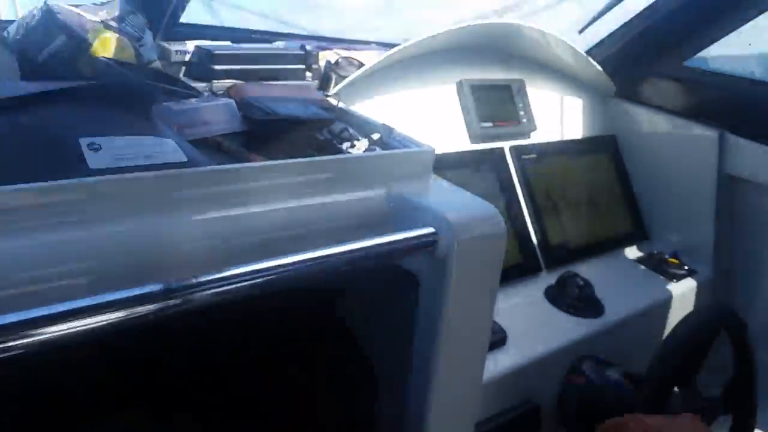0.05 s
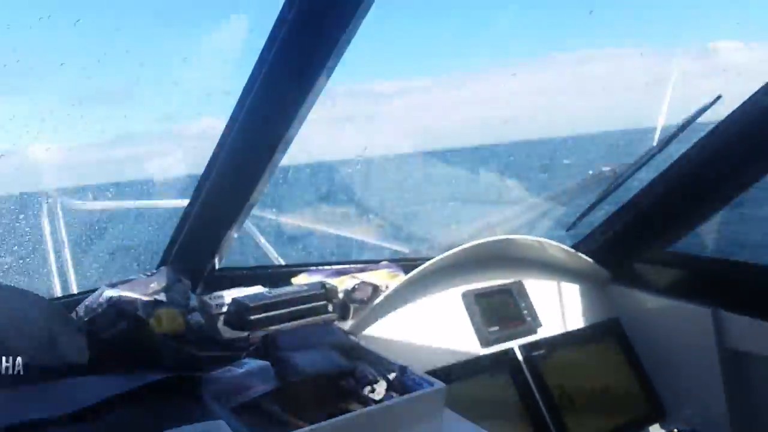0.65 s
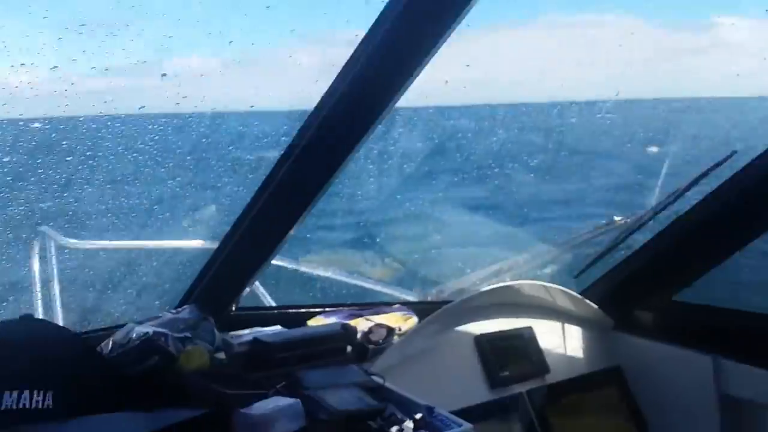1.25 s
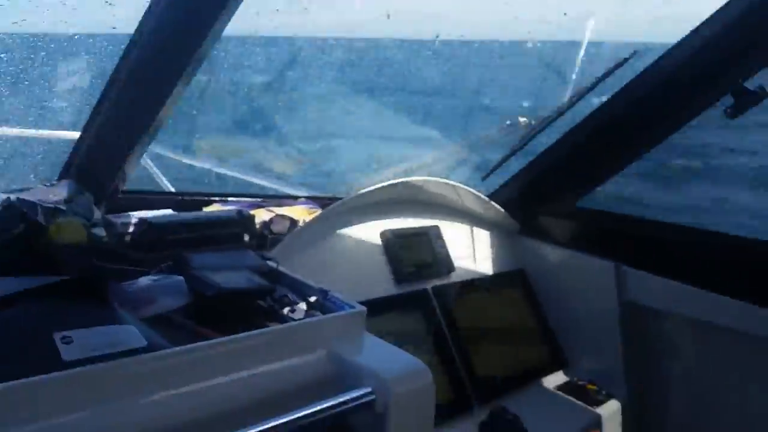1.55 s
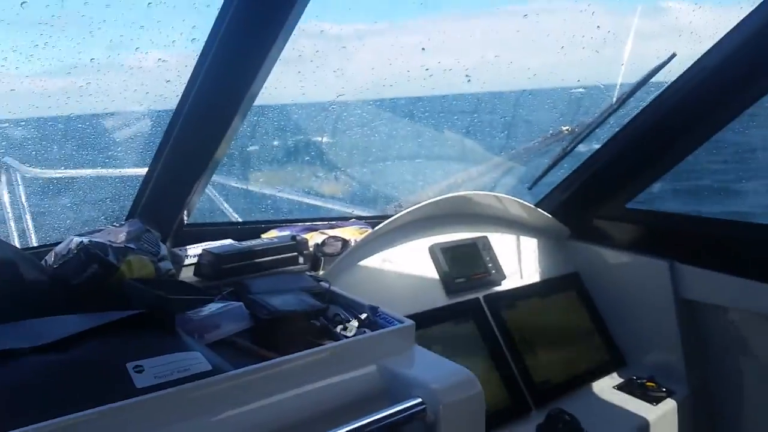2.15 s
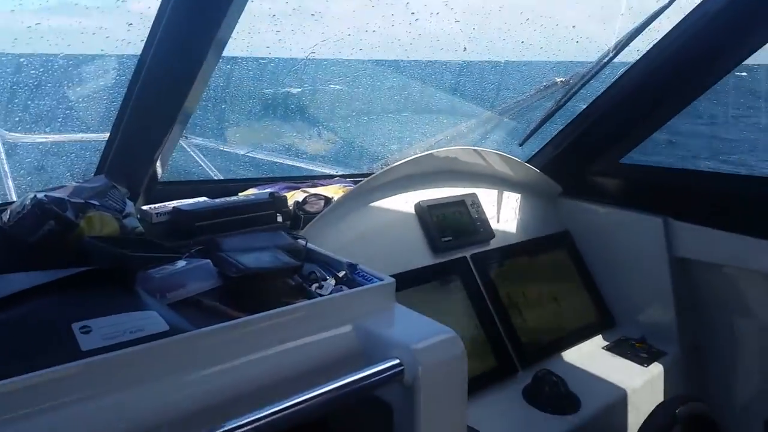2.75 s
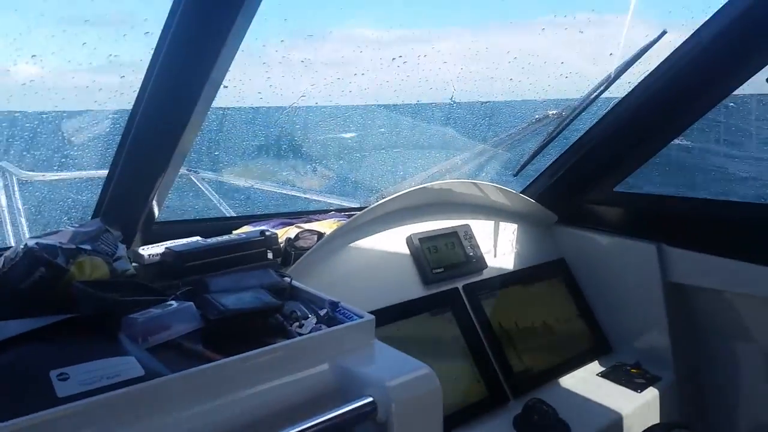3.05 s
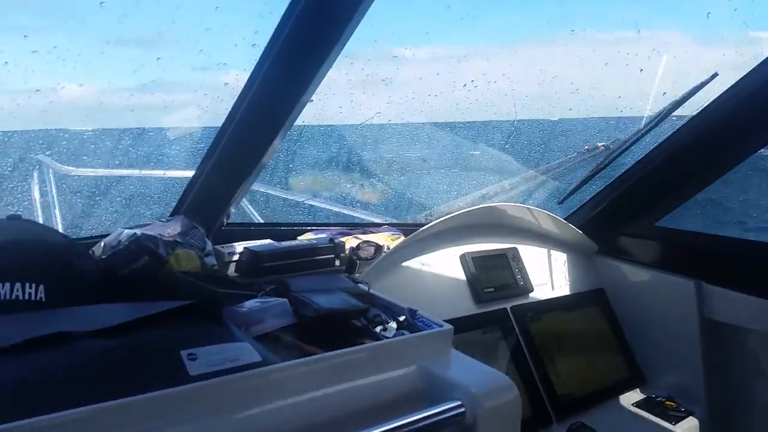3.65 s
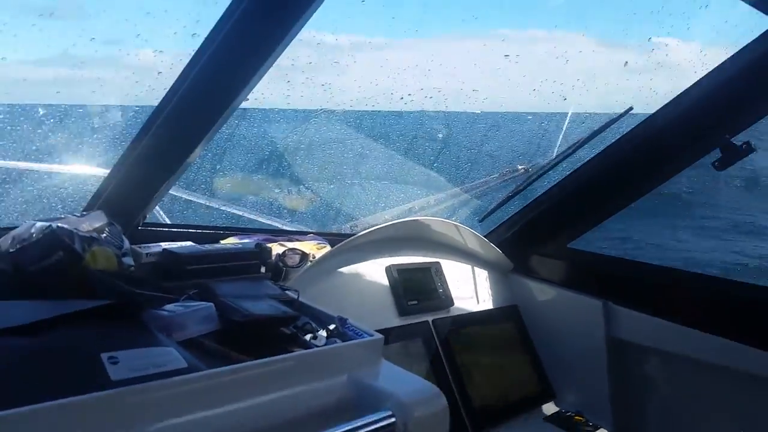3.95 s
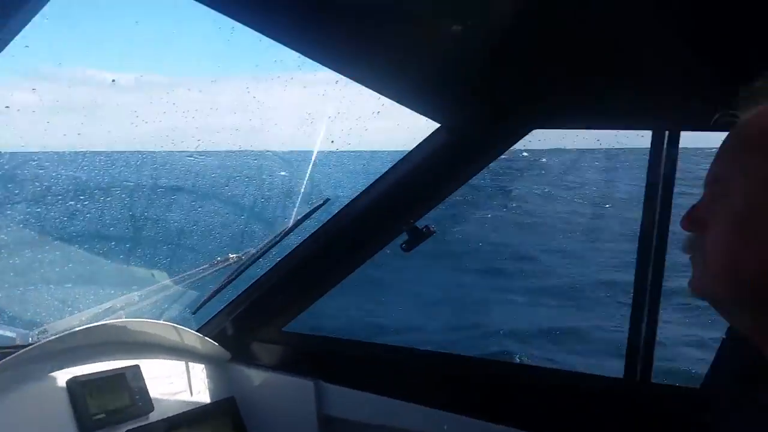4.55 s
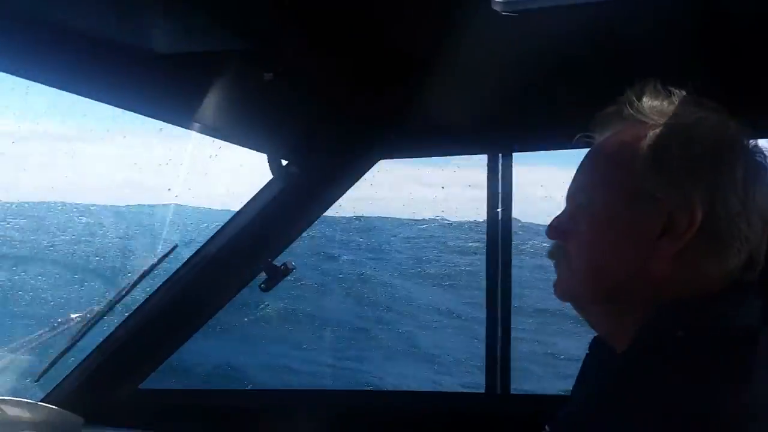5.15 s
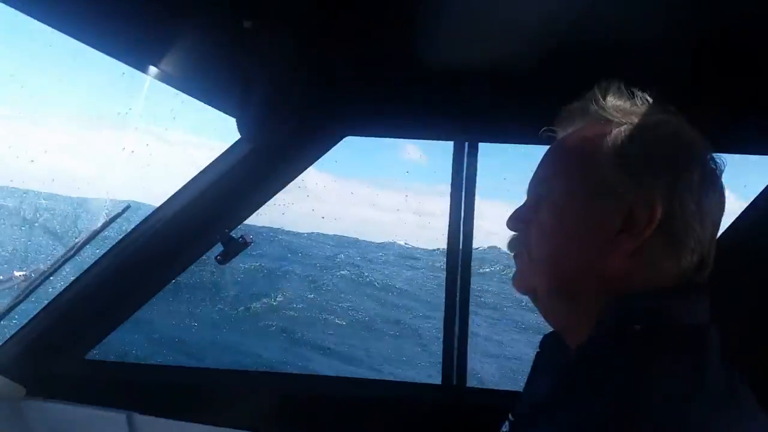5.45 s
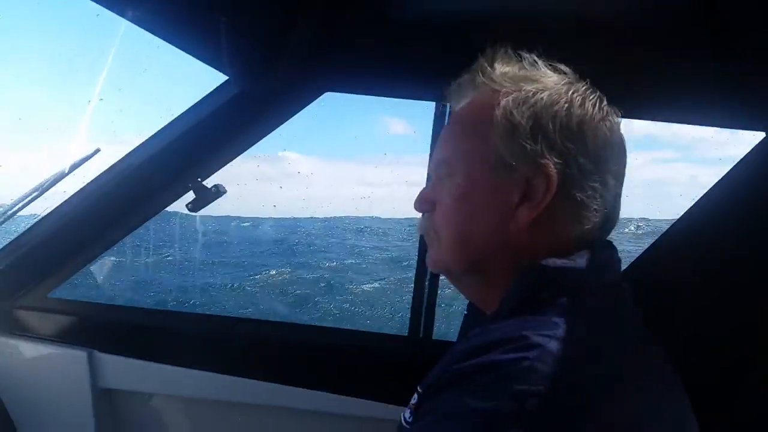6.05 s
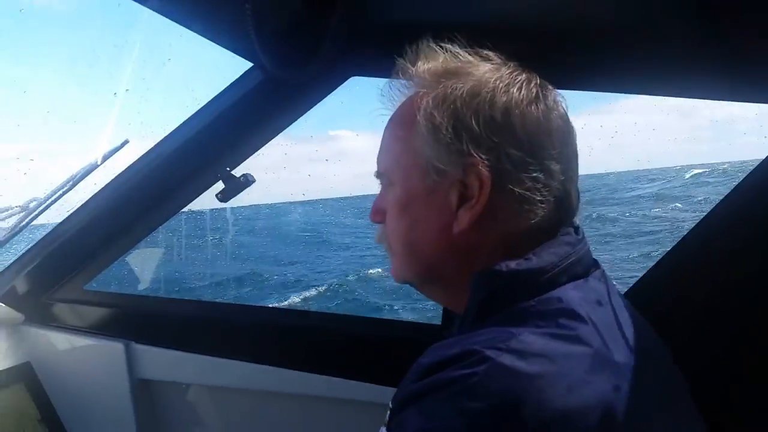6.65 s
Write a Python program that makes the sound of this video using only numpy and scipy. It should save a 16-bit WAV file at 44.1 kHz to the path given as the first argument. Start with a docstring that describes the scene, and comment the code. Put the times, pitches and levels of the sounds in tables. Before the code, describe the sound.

A motor boat in rough sea, heard from the cabin: engines drone, water rushes, waves thump the hull and spray hisses.

```python
"""A fast motor boat in a rough, windy sea, heard from inside the wheelhouse.
From the start, engines drone through the deck, water rushes along the sides and spray hisses overhead.
Around 1 s, waves thump the hull and the cabin panels knock. After a lull, the engines speed up and
the spray peaks near 2.2 s, and more thumps follow from 2.5 s. Lighter blows lead to another heavy run
at 5.2-5.6 s, and one last thump lands at 6.3 s while the engines drone on."""
import sys
import numpy as np
from scipy import signal
from scipy.fft import rfft, irfft, next_fast_len
from scipy.io import wavfile

SR = 44100
rng = np.random.default_rng(int(sys.argv[2]) if len(sys.argv) > 2 else 0)


def store_pcm(level_fs):
    """Save levels as 16-bit WAV."""
    pcm = np.round(np.clip(level_fs, -1, 1) * 32767).astype(np.int16)
    wavfile.write(sys.argv[1], SR, np.atleast_2d(pcm).T)


N = 304731
CUTOFF_HZ = 15900  # treble above this is cut
# cabin panels knocking as the hull bends: (time [s], relative peak [dB], pitch of the blow [Hz])
KNOCK_BLOWS = [(.898, -14, 546), (.91, -31, 556), (.925, -16, 537), (1.225, -17.5, 540), (2.64, -20, 464.5),
               (3.3, -26, 619.4), (4.028, -15, 560), (4.41, -21, 536), (4.52, -15, 442), (5.065, -23, 437),
               (5.44, -20, 407)]


def from_db(db):
    """Turn decibels into a number to multiply a sound by."""
    return 10 ** (np.asarray(db) / 20)


def rms_one(x):
    """Scale a sound so that its average power is 1."""
    return x / np.sqrt(np.mean(x ** 2) + 1e-20)


def in_time(rows):
    """Join the points of a time table with straight lines: one curve per value column."""
    times, *columns = np.transpose(rows)
    return [np.interp(np.arange(N) / SR, times, column) for column in columns]


def per_bin(rows, size):
    """Read a frequency table at every frequency (bin) of an FFT of this size."""
    hz, *columns = np.transpose(rows)
    bins = np.maximum(np.fft.rfftfreq(size, 1 / SR), 1)
    return [np.interp(np.log(bins), np.log(hz), column) for column in columns]


def drift(rate):
    """A smooth random wobble of typical size 1 that changes about `rate` times a second."""
    hz = np.fft.rfftfreq(8192, 1 / 1000)  # one point per millisecond
    slow = irfft(rfft(rng.standard_normal(8192)) / (1 + (hz / rate) ** 2))
    return np.interp(np.arange(N) / SR * 1000, np.arange(len(slow)), rms_one(slow))


def envelope(start_s, attack_s, hold_s, release_s):
    """A volume curve that rises, holds at 1 and dies away."""
    t = np.arange(N) / SR - start_s
    return np.clip(t / attack_s, 0, 1) * np.exp(-np.maximum(t - attack_s - hold_s, 0) / release_s)


def ring(force, hz, t60):
    """A mode, or natural tone: a push sets it ringing, and it fades by 60 dB in t60 seconds."""
    decay = from_db(-60 / (t60 * SR))
    step = 2 * np.pi * hz / SR
    return signal.lfilter([0, np.sin(step)], [1, -2 * decay * np.cos(step), decay * decay], force + 1e-18)


def strike(blows, modes, swings):
    """Each blow pushes and pulls for a few swings; a quicker blow wakes the higher tones."""
    t, out = np.arange(SR) / SR, np.zeros(N + SR)
    for start_s, peak_db, pitch_hz in blows:
        cycles = pitch_hz * t
        force = np.sin(2 * np.pi * cycles) * np.sin(np.pi * np.minimum(cycles / swings, 1)) ** 2
        ringing = sum(from_db(db) * ring(force, hz, t60) for hz, db, t60 in modes)
        at = int(start_s * SR)
        out[at:at + SR] += from_db(peak_db) * ringing / np.abs(ringing).max()
    return out[:N]


def turbulence():
    """Two unrelated streams of random pressure (white noise)."""
    return rng.standard_normal((2, N))


def drops(per_s, spread_db):
    """Two streams of clicks from landing drops: many small ones, a few large."""
    sizes = from_db(spread_db * np.minimum(rng.exponential(1, (2, N)), 5))
    signs = np.sign(turbulence())
    lands = rng.random((2, N)) < per_s / SR
    return rms_one(sizes * signs * lands)


def in_cabin(streams, spectrum):
    """Shape the tone of two streams and spread them around the cabin, most alike in the bass; power 1."""
    # how alike left and right are: (frequency [Hz], correlation [-1 to 1])
    likeness = [(50, 0.9), (130, 0.95), (270, 0.73), (400, 0.88), (560, 0.48), (800, .45), (1050, -0.12),
                (1450, -0.48), (2000, -0.16), (2600, 0.26), (3500, -0.11), (6000, -0.0032)]
    size = next_fast_len(N)
    level_db, = per_bin(spectrum, size)
    hz = np.fft.rfftfreq(size, 1 / SR)
    gain = from_db(level_db) * (hz > spectrum[0][0]) * (hz < spectrum[-1][0])
    alike = np.clip(per_bin(likeness, size)[0], -1, 1)
    mid, side = rfft(streams, size) * gain * np.sqrt([1 + alike, 1 - alike])
    return rms_one(irfft([mid + side, mid - side], size)[:, :N])


def spray(surge_db):
    """Splashes, spray and fine mist land on the glass and roof; splashes grow with flow and spray."""
    # water in the air: (time [s], relative spray level [dB], relative mist level [dB])
    airborne = [(0.0, -42.5, -46.5), (0.38, -41, -46.5), (0.8, -45, -50.5), (1.1, -47.5, -58.5),
                (1.57, -49.5, -55.0), (1.76, -40.5, -44.5), (1.98, -40.5, -44.5), (2.2, -36, -40),
                (2.36, -39.0, -39), (2.5, -46.5, -50.0), (3.05, -45.5, -51.0), (3.35, -43.5, -45.0),
                (3.62, -43.5, -47.0), (3.92, -40.5, -44.5), (4.22, -47.5, -49.5), (5.25, -44, -49.5),
                (5.48, -50, -56.5), (5.85, -47, -50.5), (6.55, -43.5, -49.5), (6.91, -45.0, -49.5)]
    # tone of heavy splashes, spray and mist, each: (frequency [Hz], relative level [dB])
    splash_tone = [(600, -1), (1200, 0), (1800, -4.5), (2400, -0.5), (3300, -4), (4800, -4.5),
                   (9000, -33.5)]
    hiss_tone = [(1800, -9), (3200, -5), (4500, -1), (7000, 1.5), (9000, -3), (14000, -22)]
    mist_tone = [(5000, -34), (7500, 0), (9500, 3.5), (12000, -1), (16000, -5.5)]
    hiss_db, mist_db = in_time(airborne)
    patter_db = 0.5 * drift(21)
    lumps_db = 1.3 * drift(5.6)
    splash_db = -40.5 + 0.45 * surge_db + 0.51 * (hiss_db - hiss_db.mean()) + lumps_db
    splash = from_db(splash_db) * in_cabin(turbulence() + 0.62 * drops(2500, 1.9), splash_tone)
    hiss = from_db(hiss_db + 1.5) * in_cabin(turbulence() + 0.5 * drops(4000, 3.5), hiss_tone)
    mist = from_db(mist_db + 6.0) * in_cabin(turbulence() + 0.77 * drops(5000, 2.9), mist_tone)
    return from_db(patter_db) * (splash + hiss + mist)


def spray_slaps(band_ratio=1.94):
    """A sheet of spray lands on the glass, swells for a moment and runs off."""
    # single sheets of spray: (time [s], level [dB], centre frequency [Hz], swell time [s])
    sheets = [(.292, -37, 7000, .008), (.89, -36.5, 2210, 0.026), (1.03, -38.5, 4000, 0.01),
              (1.205, -34, 2790, 0.011), (2.555, -41, 2200, 0.025), (2.655, -35.5, 3500, 0.014),
              (2.765, -39, 2800, 0.013), (3.399, -40, 4000, 0.015), (3.799, -42, 2500, 0.022),
              (3.985, -37.5, 2600, 0.021), (4.815, -37.5, 4995, .012), (5.025, -33, 6450, 0.023),
              (5.05, -40, 1600, .025), (5.245, -36, 2800, 0.015), (5.345, -38, 1599, .02),
              (5.44, -47, 2200, 0.011), (5.78, -39, 8000, .012), (6.26, -40, 1997, .011)]
    t, out = np.arange(SR // 4) / SR, np.zeros((2, N + SR))
    for start_s, level_db, hz, swell_s in sheets:
        swell = t / swell_s * np.exp(1 - t / swell_s)
        edges_hz = [hz / band_ratio, min(hz * band_ratio, CUTOFF_HZ)]
        band = signal.butter(2, edges_hz, "band", fs=SR, output="sos")
        hiss = rms_one(signal.sosfilt(band, rng.standard_normal((2, len(t)))))
        at = int(start_s * SR)
        out[:, at:at + len(t)] += from_db(level_db) * swell * hiss
    return out[:, :N]


def wave_swells():
    """Volume curves for heave, panel rumble and wash: each wave rises, holds and lets go."""
    # waves pressing on the hull: (time [s], heave [dB], panel rumble [dB], wash [dB], hold time [s])
    waves = [(0, -24, -15.5, -41, 0.1), (.87, -12, -14.5, -30.5, .2), (1.217, -13, -21, -41, .13),
             (2.484, -32, -11, -41, 0.068), (2.635, -16, -24, -38, 0.48), (3.751, -39, -38, -35, .12),
             (4.005, -13.5, -40, -44, 0.15), (4.3, -21.5, -18, -42, .14), (4.556, -19.5, -25, -47, 0.22),
             (5.021, -30, -21, -28, 0.046), (5.285, -9.5, -20.5, -28.5, 0.16),
             (5.558, -23, -17.5, -31, 0.11), (5.82, -17.5, -21, -32.5, 0.11), (6.304, -20.5, -20, -35, .13)]
    power = 0
    for start_s, *levels_db, hold_s in waves:
        swell = envelope(start_s, attack_s=0.017, hold_s=hold_s, release_s=0.077)
        power = power + np.outer(from_db(levels_db), swell) ** 2
    return np.sqrt(power)


def rushing_water(surge_db, wash):
    """Water churns along the sides, swells with each wave and slaps the hull at each knock."""
    # tone of the rushing water: (frequency [Hz], relative level [dB])
    rush_tone = [(150, -12), (245, -1.5), (280, -1.5), (320, 3.5), (370, 2.5), (490, -2), (540, -1),
                 (640, -5.5), (800, -6.5), (1000, -11), (1350, -14.5), (1900, -19.5), (4000, -29),
                 (12000, -57)]
    churn = from_db(-31.0 + surge_db + 1.62 * drift(14.5))
    slosh = sum(from_db(db - 9.5) * envelope(start_s, attack_s=0.003, hold_s=0, release_s=0.028)
                for start_s, db, _ in KNOCK_BLOWS)
    volume = np.sqrt(churn ** 2 + wash ** 2 + slosh ** 2)
    return volume * in_cabin(turbulence() + 0.49 * drops(500, 3.0), rush_tone)


def panel_knocks(lean_left_db=1.0, trim_db=-1.5):
    """The bending hull makes the cabin panels judder against their frames."""
    # natural tones of the panels: (frequency [Hz], relative level [dB], ring time [s])
    panel_modes = [(386, -22, 0.18), (455, -2, 0.15), (503, 7, 0.17), (542.7, 8.5, 0.25), (608, 5, 0.16),
                   (690, -15, .08), (790, -7, .07)]
    left_right = from_db([[trim_db + lean_left_db], [trim_db - lean_left_db]])
    return strike(KNOCK_BLOWS, panel_modes, swings=5.9) * left_right


def hull_rumble(surge_db, wave_heave, wave_rumble):
    """Water pressure shakes the cabin air, the whole hull (heave) and its panels; waves add swells."""
    # tone of the shaking air, hull and panels, each: (frequency [Hz], relative level [dB])
    shudder_tone = [(10, 3), (17, -1), (24, -9), (32, -4), (45, -11), (80, -45)]
    heave_tone = [(12, -7), (22, 12), (32, -26), (46, -6), (58, 7), (74, 1), (98, 3), (115, -10.5),
                  (150, 0), (250, -61)]
    panel_tone = [(70, -10), (105, -3.5), (130, 0.5), (145, -3.5), (162, -4.5), (195, -6), (225, -9.5),
                  (260, -19.5), (400, -33)]
    calm_heave = from_db(-25 + 0.3 * surge_db)  # the shaking between waves
    calm_rumble = from_db(-22.5 + 0.61 * surge_db)
    shudder = in_cabin(turbulence(), shudder_tone)
    heave = np.hypot(calm_heave, wave_heave) * in_cabin(turbulence(), heave_tone)
    panels = np.hypot(calm_rumble, wave_rumble) * in_cabin(turbulence(), panel_tone)
    return from_db(-32.0) * shudder + from_db(-3.5) * heave + from_db(-2.5) * panels


def hull_slams():
    """Waves thump the hull from below and set it ringing."""
    # waves hitting the hull: (time [s], peak level [dB], pitch of the blow [Hz])
    blows = [(.903, -4, 112), (.975, -7, 108), (1.03, -8.5, 59.7), (1.222, -6, 57), (1.385, -9.5, 51.1),
             (2.501, -5, 123), (2.554, -11, 137), (2.675, -5.5, 60.6), (2.85, -8, 52.68),
             (3.025, -19, 102.1), (4.015, -19, 57.7), (4.6, -13.5, 55), (5.235, -10, 108), (5.305, -5, 67),
             (5.39, -5.5, 55.5), (5.49, -5, 55), (5.592, -16, 141), (6.334, -11, 57.9)]
    # natural tones of hull and deck: (frequency [Hz], relative level [dB], ring time [s])
    hull_modes = [(54, 14, 0.14), (55.2, 2, 0.37), (73, -34, 0.11), (106, 12, 0.097), (113.6, -32, 0.22),
                  (131, 5.5, 0.16), (194, -8, 0.21), (209, -20, 0.16)]
    return strike(blows, hull_modes, swings=2.17)


def engines(waver_db=2.07, rough_db=3.0):
    """Tones at whole multiples of the shaft speed; they flutter as the propellers bite uneven water."""
    # engine shaft: (time [s], speed [turns per s])
    shaft_speed = [(0, 44.6), (.6, 43), (1.2, 43.7), (2.2, 50), (3.2, 45.5), (4.0, 43.9), (4.6, 45.4),
                   (5.3, 45), (5.6, 45.8), (5.9, 47.5), (6.3, 45.6), (6.91, 45)]
    # drone in the cabin: (time [s], relative shaft tone level [dB], relative octave level [dB])
    drone = [(0.0, -23.5, -14), (0.33, -15, -30), (0.62, -16, -18), (0.9, -17, -17.5), (1.4, -22, -27),
             (1.65, -28.5, -33), (2.05, -26.5, -28), (2.3, -23.5, -20.5), (2.6, -28, -23), (3.0, -26, -17),
             (3.3, -26.5, -28.5), (3.6, -19.5, -22.5), (4.1, -16.5, -31.5), (4.48, -22.5, -23),
             (4.72, -16.5, -30), (5.55, -17, -23), (6.1, -26.5, -36), (6.91, -18.5, -25)]
    # whine in the cabin at seven times the shaft speed: (time [s], relative level [dB])
    whine = [(0.0, -33), (0.5, -49), (1.0, -39), (1.6, -50.5), (2.65, -36), (3.7, -42), (4.4, -39),
             (5.2, -40.5), (5.9, -32), (6.2, -38.5), (6.91, -33.5)]
    # other engine tones: (multiple of the shaft speed, level compared with the whine [dB])
    overtones = [(3, 1.5), (4, 1.5), (8, -7), (10, -5), (12, -13)]
    turns_per_s, = in_time(shaft_speed)
    shaft_db, octave_db = in_time(drone)
    whine_db = in_time(whine)[0] - 1.5
    angle = 2 * np.pi * np.cumsum(turns_per_s * (1 + 0.0025 * drift(5.5))) / SR
    # drift inside from_db wobbles the volume; inside sin it wobbles the pitch
    out = from_db(shaft_db - 1.0 + 0.64 * waver_db * drift(3.1)) * np.sin(angle + 0.065 * drift(3.0))
    out += from_db(octave_db - 1.5 + waver_db * drift(6.4)) * np.sin(2 * angle + 0.7 * drift(15.0))
    out += from_db(whine_db + 2.6 * drift(9)) * np.sin(7 * angle + 0.6 * drift(6))
    for multiple, level_db in overtones:
        flutter = from_db(level_db + whine_db + rough_db * drift(3.5))
        out += flutter * np.sin(round(multiple) * angle + 1.1 * drift(3.1))
    return np.sqrt(2) * out


def scene():
    """Engines, thumps, knocks and rumble come through the boat itself; the water is all around."""
    # water flowing past as the hull sinks in and lifts out: (time [s], level [dB])
    flow = [(0.0, -30.5), (0.4, -33.5), (0.78, -36.5), (1.0, -28.5), (1.3, -32.5), (1.6, -41), (2.1, -38),
            (2.6, -26), (3.2, -33.0), (3.35, -29.5), (3.6, -33), (3.95, -29), (4.2, -32), (4.5, -29.0),
            (4.9, -32.5), (5.55, -30), (6.15, -32.0), (6.91, -31)]
    cruise_db = -32.5  # flow with the hull riding level
    surge_db = in_time(flow)[0] - cruise_db
    wave_heave, wave_rumble, wash = wave_swells()
    boat = engines() + hull_slams() + panel_knocks() + hull_rumble(surge_db, wave_heave, wave_rumble)
    return boat + rushing_water(surge_db, wash) + spray(surge_db) + spray_slaps()


def record(dry):
    """Each microphone opening colours its side; big peaks are rounded and the highest treble is cut."""
    # tone of the two openings: (frequency [Hz], left gain [dB], right gain [dB])
    openings = [(58, 2, 2), (313, -0.95, -1.7), (520, -2.5, -5), (1410, 2.5, -2), (2500, 0.5, -4.5),
                (3900, 3, -7), (5140, 4.5, -12.5), (6800, 7, -11.5), (7450, 1, -12.5), (8430, -9, -10),
                (9740, -19, -1), (10770, -9, 3.5), (13000, -8, 2), (16000, -1, -0.5)]
    size = next_fast_len(N + SR // 10)
    coloured = irfft(rfft(dry, size) * from_db(per_bin(openings, size)), size)[:, :N]
    rounded = coloured / (1 + coloured ** 6) ** (1 / 6)
    treble_cut = signal.ellip(12, 0.1, 80, CUTOFF_HZ, fs=SR, output="sos")
    return signal.sosfilt(treble_cut, rounded)


dry = scene()
out = record(dry)
store_pcm(out)
```